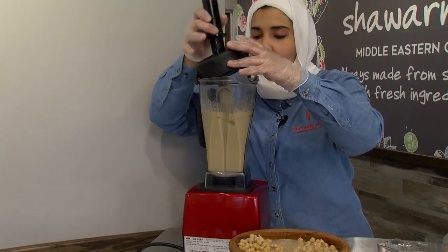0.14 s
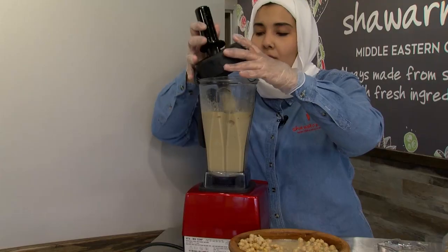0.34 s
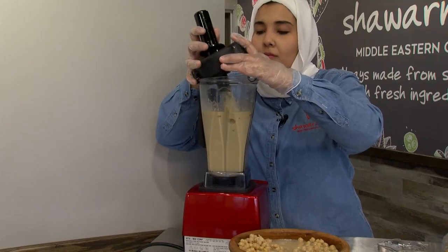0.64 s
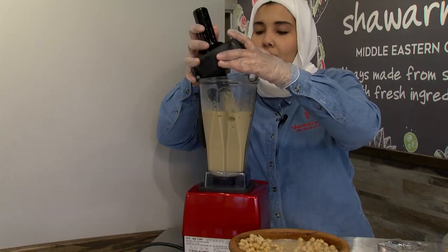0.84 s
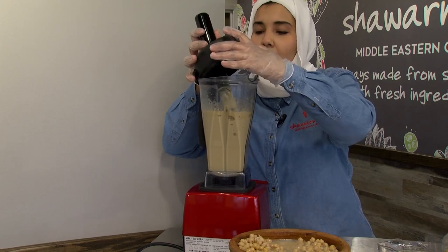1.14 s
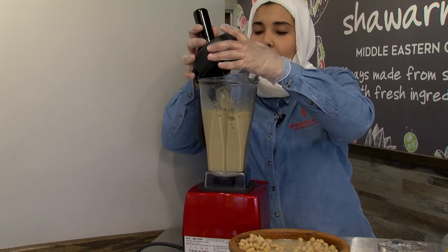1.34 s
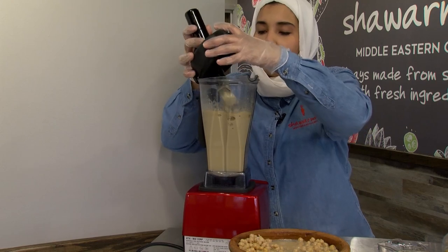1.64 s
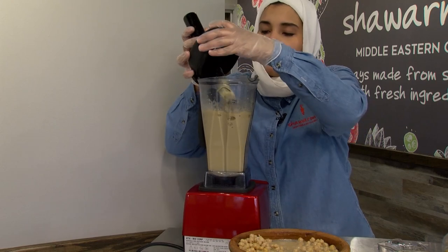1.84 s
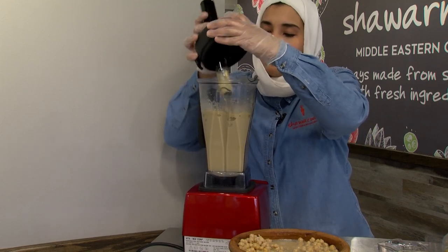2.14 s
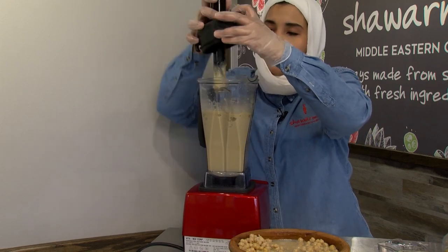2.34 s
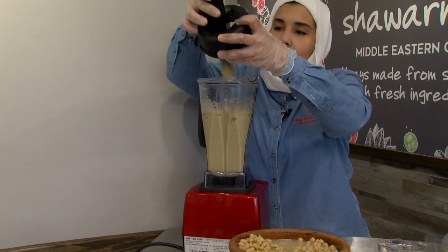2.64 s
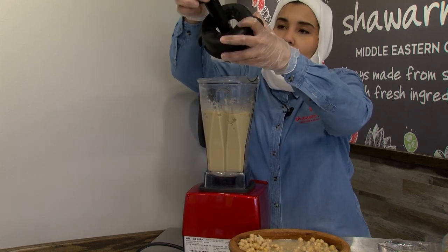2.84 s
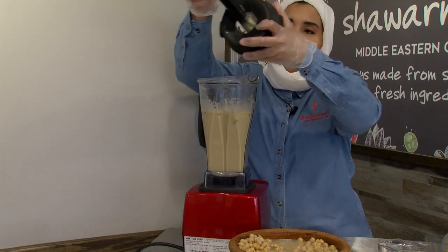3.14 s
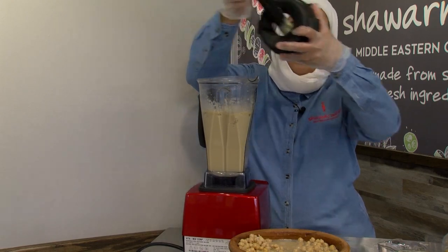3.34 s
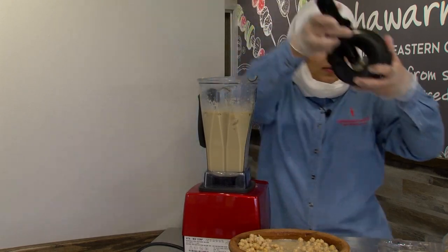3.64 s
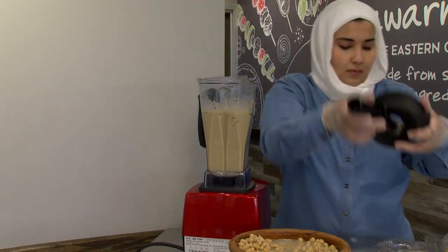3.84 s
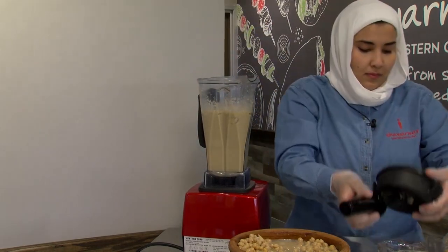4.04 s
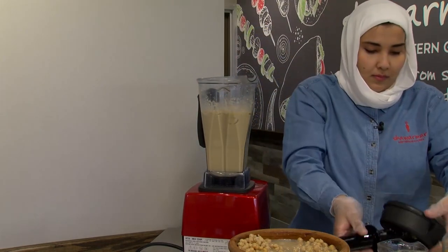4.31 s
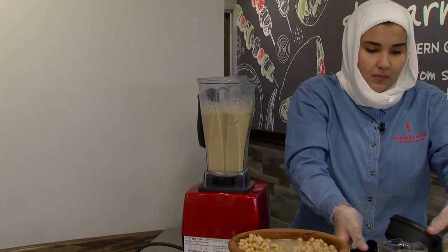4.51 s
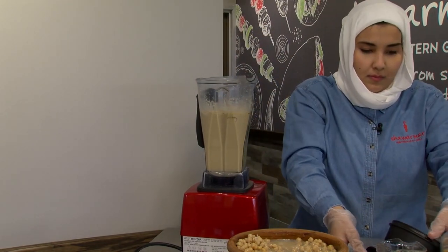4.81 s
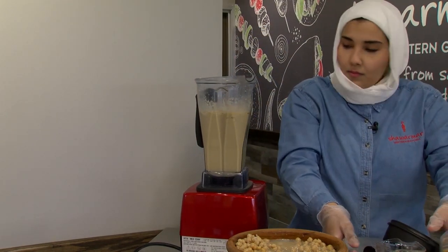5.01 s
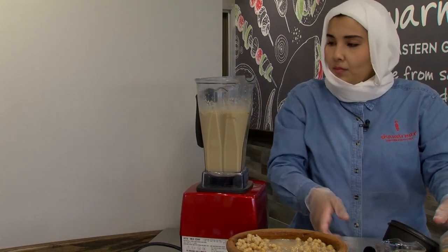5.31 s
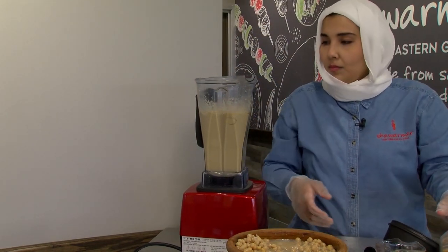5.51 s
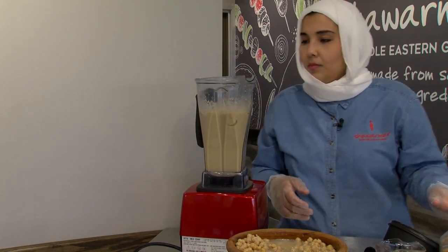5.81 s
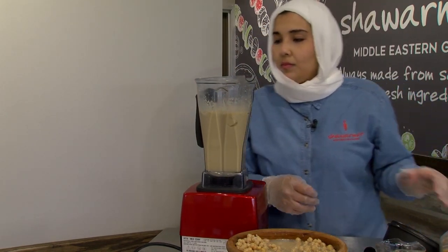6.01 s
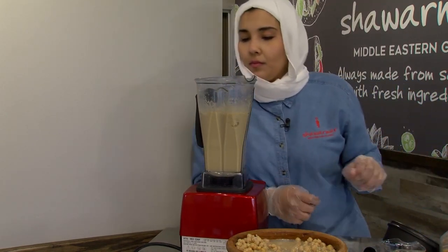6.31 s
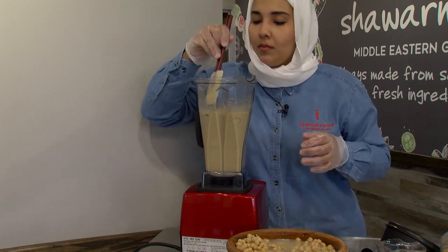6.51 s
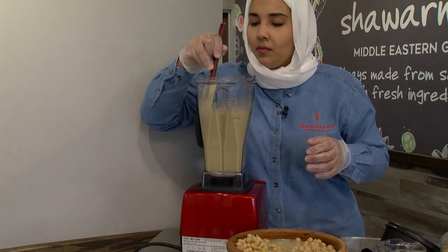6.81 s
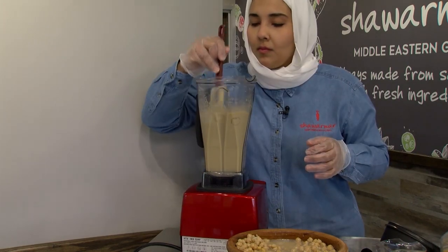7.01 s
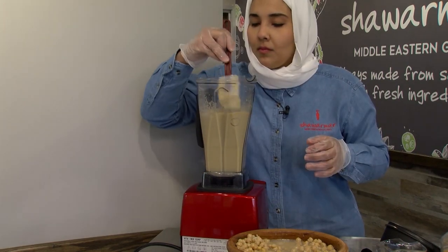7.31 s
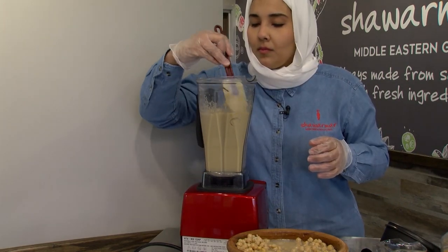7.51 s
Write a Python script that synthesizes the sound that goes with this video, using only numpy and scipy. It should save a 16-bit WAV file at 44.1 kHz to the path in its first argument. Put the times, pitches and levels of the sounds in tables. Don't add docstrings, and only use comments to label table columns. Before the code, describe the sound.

Close, continuous blender drone with wet churning hiss; the lid comes off, the tone flutters and brightens, and a dipped spatula makes it fuller.

```python
import sys
import numpy as np
from scipy import signal
from scipy.io import wavfile

SR = 44100
rng = np.random.default_rng(int(sys.argv[2]) if len(sys.argv) > 2 else 0)


def materialize(psi):
    bounded = np.clip(np.atleast_2d(psi).T, -1, 1)
    quanta = np.round(bounded * 32767).astype(np.int16)
    wavfile.write(sys.argv[1], SR, quanta)


def ratio_of_db(decibels):
    return 10 ** (np.asarray(decibels, float) / 20)


N = 337788

MAINS_HZ, MAINS_DB = 120, -49
# (frequency [Hz], level per Hz [dB])
RUMBLE_SPECTRUM = [(20, -6.5), (40, -6), (82, -24), (125, -5), (150, -7.5), (210, -4.5), (255, -23),
                   (300, 3), (400, -5), (440, 1.5), (520, -15.5)]
# (time [s], peak level [dB], pitch [Hz])
COUNTER_BUMPS = [(0.005, -33, 90), (2.63, -37, 85), (4.2, -31, 251), (6.56, -30, 230), (7.655, -36, 60)]
# (time [s], peak level [dB])
HARD_BITS = [(4.1944, -29), (5.7643, -40), (6.818, -41), (7.0643, -38), (7.072, -39), (7.088, -38),
             (7.147, -39.5)]
# (time [s], opening [0-1])
LID_OPENING = [
    (0, 0.01),
    (1.45, 0.08),
    (1.62, 0.39),
    (2.0, 0.4),
    (2.3, 0.67),
    (3.4, .8),
    (3.95, 0.99),
    (7.66, 1),
]
# (time [s], motor base level [dB], reflection hump [Hz],
# brightness from facing the jar [dB])
WEARER_MOVES = [(0, -40, 9480, 4), (.5, -44, 9400, 2), (.9, -39, 9300, 1.5), (1.45, -45, 9200, 2),
                (1.85, -51, 9100, 1), (2.3, -42.5, 9030, 0), (3.0, -40.5, 10200, 0),
                (3.35, -43, 10700, 0.5), (3.65, -31.5, 11300, 3.5), (3.95, -37, 11300, 0),
                (4.15, -33, 11400, 3), (4.7, -33.5, 11200, 2.5), (5.0, -29, 11240, 1.5),
                (5.55, -34, 10900, 2), (5.85, -32.5, 10090, 1), (6.15, -34.5, 9800, 0),
                (6.3, -35.5, 9600, -3.5), (6.7, -39.5, 8730, -1), (7.66, -39, 8700, -1)]
# (frequency [Hz], width [Hz], level [dB])
COVERED_MODES = [(517.2, 37.5, 1), (609, 84, -1), (491, 59, -8)]
# (frequency [Hz], width [Hz], level [dB])
OPEN_MODES = [(751, 186, 9), (1000, 150, -4.5), (659, 183, 4.5)]
SPATULA_IN_S, SPATULA_RAMP_S = 6.45, 0.25
PLUNGE_S, PLUNGE_DOWN_S, PLUNGE_UP_S, PLUNGE_HZ, PLUNGE_DB = 7.13, 0.1, 0.17, -290, 5.5
HOVER_S, HOVER_HALF_S, HOVER_HZ, HOVER_DB = 6.33, 0.13, 49.9, 6
# (time [s], hiss level [dB])
CHURN_VIGOUR = [(0, -35), (.6, -32.5), (1.5, -31.5), (1.62, -34.5), (2.1, -33), (2.4, -34.5), (2.95, -36),
                (3.5, -35.5), (3.75, -33.5), (4.1, -33.5), (4.6, -32), (5.1, -31.5), (5.65, -34),
                (6.25, -31.5), (6.7, -37), (7.66, -38)]
# (frequency [Hz], level per Hz [dB])
HISS_SPECTRUM = [(600, -33.5), (1000, -1), (1150, -6.5), (1450, -9), (2000, -11.5), (2800, -16),
                 (3500, -21), (5000, -25), (7000, -29), (9000, -33.5), (11000, -38.5), (13000, -44),
                 (15700, -52)]
# (time [s], half length [s], churn change [dB], blade tone change [dB])
WHIRLPOOL_SURGES = [(0.078, 0.033, 0, -4), (0.142, .02, 4, 0.5), (0.552, 0.19, 0.5, -2.5),
                    (1.208, 0.033, 1.5, -1), (2.22, 0.049, -2, -1.5), (2.407, 0.036, 3, 2),
                    (2.515, 0.073, -2, -3), (2.723, .05, -1, -3.5), (2.853, 0.034, 2, 0.5),
                    (2.98, 0.046, -3, -4.5), (3.245, 0.11, 0.5, 0.5), (3.442, .03, -1.5, -2),
                    (3.594, 0.08, 0.5, -3.5), (3.922, .04, -4, 0), (4.202, 0.018, 2.5, -2),
                    (4.29, .05, 0, -2), (4.369, 0.028, 2, 1.5), (4.596, 0.025, 3, 1), (4.766, .03, 3, 1.5),
                    (4.867, 0.072, -2.5, -4), (5.053, 0.055, 2.5, 0), (5.33, 0.027, -1.5, -2.5),
                    (5.548, .04, 2.5, 2.5), (5.632, 0.052, -2, -5.5), (5.804, .03, 3, 1),
                    (5.964, 0.02, -0.5, -0.5), (6.286, 0.034, 0.5, -2), (7.068, 0.014, 3.5, 2),
                    (7.45, .04, -.5, -1.5)]
# (time [s], speed [turns/s])
SHAFT_SPEED = [(0, 168.5), (.75, 169.7), (1.1, 169.4), (2.2, 168.7), (2.55, 168.9), (2.8, 170.6),
               (3.45, 170.9), (4.15, 171.5), (4.5, 170.6), (5.3, 171.8), (5.75, 172), (6.1, 170.4),
               (6.4, 168.9), (6.97, 169.3), (7.5, 168.2), (7.66, 167)]
# (time [s], speed loss [turns/s])
BRAKING_CHUNKS = [(0, 2.2), (.76, 2.5), (1.07, 2.2), (1.67, 1.6), (4.17, 3.3), (7.02, 1.2)]
BRAKE_S, RECOVER_S = 0.03, 0.22
# (time [s], half length [s], second order [dB], sixth [dB], eighth [dB])
JAR_WOBBLES = [(0.172, 0.11, -32.5, -28, -37), (0.446, 0.16, -36, -30, -35), (0.71, 0.19, -30.5, -24, -42),
               (1.092, 0.17, -36, -31.5, -55), (1.5, 0.13, -47, -25, -52), (2.056, 0.043, -55, -19.5, -54),
               (1.797, .1, -51, -28.5, -56), (2.3, 0.11, -42, -26, -55), (2.852, .2, -43, -33.5, -55),
               (3.3, 0.25, -38.5, -29.5, -53), (3.684, 0.17, -32.5, -38.5, -57), (4.0, 0.17, -48, -34, -53),
               (5.02, 0.091, -34, -36, -50), (5.905, 0.21, -34, -26, -52), (6.274, 0.14, -32, -29, -41),
               (6.424, 0.15, -42, -36, -34.5), (7.093, 0.31, -42, -29, -50.5)]
# (second order [dB], sixth order [dB], eighth order [dB])
STILL_JAR = (-49, -40.5, -52)
# (time [s], depth [dB])
BLADE_SLIPS = [(0.625, -0.5), (2.506, 1), (3.789, 16), (3.831, 8), (4.154, 27), (4.34, 21), (4.416, 19),
               (4.542, 38), (4.575, 5), (4.655, 6), (4.723, 39), (4.831, 19), (4.868, 24), (4.922, 15),
               (5.473, 4), (5.946, 23)]
BLADE_DB, LOADED_DB, LOADED_SAG_DB_PER_S = -12, 3, 1
MEAN_CHURN_DB, MEAN_BASE_DB = -34, -39


def in_time(rows):
    s, *columns = np.transpose(rows)
    return [np.interp(np.arange(N) / SR, s, c) for c in columns]


def bell(x, centre, width):
    return np.exp(-((x - centre) / width) ** 2)


def ramp(x, start, length):
    return np.clip((x - start) / length, 0, 1)


def rms_one(x):
    return x / np.sqrt(np.mean(x ** 2) + 1e-20)


def drift(rate, step=10):
    r = np.exp(-2 * step * np.pi * rate / SR)
    noise = rng.standard_normal(N // step + 4002)
    slow = signal.lfilter([1], [1, -2 * r, r * r], noise)[4000:]
    return np.interp(np.arange(N) / step, np.arange(len(slow)), rms_one(slow))


def resonate(x, hz, width):
    r = np.exp(-np.pi * width / SR)
    gain = (1 - r * r) / 2
    return signal.lfilter([gain, 0, -gain], [1, -2 * r * np.cos(2 * np.pi * hz / SR), r * r], x)


def coloured(spectrum, patchy_db, rate):
    hz_at, db_at = np.transpose(spectrum)
    bands = round(4 * np.log2(hz_at[-1] / hz_at[0]))
    edges = np.geomspace(hz_at[0], hz_at[-1], bands + 1)
    white, out = rng.standard_normal((2, N)), 0
    for k, (low, high) in enumerate(zip(edges, edges[1:])):
        sos = signal.butter(2, [low, high], "band", fs=SR, output="sos")
        band = signal.sosfilt(sos, white[k % 2])
        level_db = np.interp(np.log(low * high) / 2, np.log(hz_at), db_at)
        out = out + band * ratio_of_db(level_db + patchy_db * drift(rate))
    return rms_one(out)


def sliding_band(hz, base):
    return rms_one(np.real(base * np.exp(2j * np.pi * np.cumsum(hz) / SR)))


def shaft():
    t = np.arange(N) / SR
    loss = 0
    for s, hz in BRAKING_CHUNKS:
        loss = loss + hz * ramp(t, s, BRAKE_S) * np.exp(-np.maximum(t - s, 0) / RECOVER_S)
    return np.cumsum(in_time(SHAFT_SPEED)[0] - loss) / SR


def surges():
    t = np.arange(N) / SR
    return sum(bell(t, s, half) * np.array([[churn_db], [blade_db]])
               for s, half, churn_db, blade_db in WHIRLPOOL_SURGES)


def wobbles():
    t = np.arange(N) / SR
    swells = sum(bell(t, s, half) * ratio_of_db(np.array(levels_db))[:, None]
                 for s, half, *levels_db in JAR_WOBBLES)
    return 20 * np.log10(ratio_of_db(np.array(STILL_JAR))[:, None] + swells)


def mains_hum():
    t = np.arange(N) / SR
    return ratio_of_db(MAINS_DB + 2.0 * drift(2.7)) * np.sin(2 * np.pi * MAINS_HZ * t)


def rumble(base_db, vigour_db):
    shake_db = -45.5 + 0.3 * (base_db - MEAN_BASE_DB) + 0.22 * vigour_db
    return ratio_of_db(shake_db + 9.5) * coloured(RUMBLE_SPECTRUM, patchy_db=1.0, rate=4)


def thuds():
    t = np.arange(N) / SR
    return sum(ratio_of_db(db) * bell(t, s, 0.015) * np.sin(2 * np.pi * hz * (t - s))
               for s, db, hz in COUNTER_BUMPS)


def ticks():
    strikes = np.zeros(N)
    for s, db in HARD_BITS:
        strikes[round(s * SR)] = ratio_of_db(db + 3.0)
    fading = signal.lfilter([1], [1, -ratio_of_db(-60 / (0.014 * SR))], strikes + 1e-18)
    burst = fading * rng.standard_normal(N)
    return signal.sosfilt(signal.butter(1, [2500, 9000], "band", fs=SR, output="sos"), burst)


def low_air(modes, level_db):
    white, air = rng.standard_normal(N), 0
    for k, (hz, width, db) in enumerate(modes):
        ring = resonate(resonate(white, hz, width * 1.38), hz, width * 1.38)
        air = air + ratio_of_db(db) * ring * (-1) ** k
    return ratio_of_db(level_db + 0.96 * drift(24) + 0.65 * drift(5)) * rms_one(air)


def upper_air(level_db, hz, half_width):
    hz = hz + 22 * drift(6)
    base = drift(130) + 1j * drift(130)
    pace = np.cumsum(half_width) / np.max(half_width)
    return ratio_of_db(level_db - 0.5) * sliding_band(hz, np.interp(pace, np.arange(N), base))


def sheen(vigour_db, opening, hump_hz, facing_db, dipped):
    gone = ramp(opening, 0.8, 0.28)
    aside = gone * (1 - dipped)
    splash_db = -19.0 + facing_db + 0.15 * vigour_db
    hump_db = 3.5 * gone - 1.2 * dipped
    top_db = -1.2 + 5.5 * ramp(opening, 0.3, 0.5) - 0.3 * vigour_db - 2.5 * dipped
    top_db = top_db - aside * (6.5 + 4.5 * bell(hump_hz, 10600, 500))
    wall_hz = np.where(opening < 0.85, 2850, 2480)
    wall_db = 1.5 + 4.0 * aside - 2.5 * dipped
    shadow_db = -1.5 - 5.0 * bell(opening, 0.37, 0.24) + 3.0 * aside
    return splash_db, hump_hz, hump_db, top_db, wall_hz, wall_db, shadow_db, dipped


def churn(turns, hiss_db, *colour):
    hz, s, frames = signal.stft(rng.standard_normal(N), SR, nperseg=512)
    hz, at = hz[:, None] + 1, np.minimum(s * SR, N - 1).astype(int)
    splash_db, hump_hz, hump_db, top_db, wall_hz, wall_db, shadow_db, dipped = [c[at] for c in colour]
    hz_at, db_at = np.transpose(HISS_SPECTRUM)
    steady_db = np.interp(np.log(hz), np.log(hz_at), db_at)
    colour_db = (splash_db + 17.0) * np.clip((hz - 4000) / 7000, 0, 1.3)
    colour_db += hump_db * (bell(hz, hump_hz, 1300) - bell(hz, 0.81 * hump_hz, 700))
    colour_db += 0.7 * hump_db * (1 - dipped) * bell(hz, 4500 + 1.8 * (hump_hz - 9700), 550)
    colour_db += top_db * np.clip((hz - 11500) / 3500, 0, 1)
    colour_db += wall_db * bell(hz, wall_hz, 120) + shadow_db * bell(hz, 1270, 130)
    scatter_db = 2.0 * bell(hz, 4600, 700) - 2.5 * bell(hz, 7700, 400)
    scatter_db = scatter_db + 4.5 * bell(hz, 12700, 1300) - 1.5 * bell(hz, 3000, 400)
    colour_db += dipped * scatter_db
    hiss = signal.istft(frames * ratio_of_db(steady_db + colour_db), SR)[1][:N]
    hiss = hiss / np.sqrt(np.mean(ratio_of_db(2 * steady_db)))
    splutter = ratio_of_db(0.85 * drift(70))
    pulse = 1 + 0.068 * np.cos(2 * np.pi * turns) + 0.13 * np.cos(4 * np.pi * turns)
    return ratio_of_db(hiss_db + 7) * splutter * pulse * hiss


def shaft_tone(turns, level_db, order, rough, rate):
    waver = 1 + rough * (drift(rate) + 1j * drift(rate))
    return np.sqrt(2) * ratio_of_db(level_db) * np.real(waver * np.exp(2j * np.pi * order * turns))


def rocking(turns, base_db, twice_db, sixth_db, eighth_db):
    once = shaft_tone(turns, base_db - 0.6, order=1, rough=0.044, rate=4.6)
    twice = shaft_tone(turns, twice_db, order=2, rough=0.17, rate=9.7)
    sixth = shaft_tone(turns, sixth_db - 1.5, order=6, rough=0.23, rate=17)
    eighth = shaft_tone(turns, eighth_db, order=8, rough=0.42, rate=21)
    return once + twice + sixth + eighth


def blades(turns, blade_db, lumpy):
    t = np.arange(N) / SR
    slips_db = sum(depth_db * bell(t, s, 0.0047) for s, depth_db in BLADE_SLIPS)
    return shaft_tone(turns, blade_db + 0.46 - slips_db, order=4, rough=0.18 * lumpy, rate=37.5)


def scene():
    t, turns = np.arange(N) / SR, shaft()
    (opening,) = in_time(LID_OPENING)
    base_db, hump_hz, facing_db = in_time(WEARER_MOVES)
    swing_db, tone_db = surges()
    twice_db, sixth_db, eighth_db = wobbles()
    hiss_db = in_time(CHURN_VIGOUR)[0] + swing_db
    vigour_db = hiss_db - MEAN_CHURN_DB

    dipped = ramp(t, SPATULA_IN_S, SPATULA_RAMP_S)
    plunge = bell(t, PLUNGE_S, np.where(t < PLUNGE_S, PLUNGE_DOWN_S, PLUNGE_UP_S))
    hover = bell(t, HOVER_S, HOVER_HALF_S)
    loaded_db = LOADED_DB - LOADED_SAG_DB_PER_S * np.maximum(t - 6.9, 0)
    blade_db = BLADE_DB + tone_db + dipped * loaded_db

    drum_db = (twice_db + 34) * (1 - opening)
    covered_db = -17 + 0.2 * drum_db - 11.5 * opening ** 1.2 + 0.4 * vigour_db + 1.5 * dipped
    open_db = -28 + 7.38 * ramp(opening, 0.32, 0.26) + 0.49 * vigour_db
    open_db = open_db + 1.3 * dipped + 0.57 * HOVER_DB * hover
    upper_db = -26 - 13 * ramp(opening, 0.05, 0.81) + 7 * ramp(opening, 0.77, 0.12)
    upper_db = upper_db + 0.61 * vigour_db + 3.2 * ramp(t, 6.88, 0.1)
    upper_db = upper_db + PLUNGE_DB * plunge + HOVER_DB * hover
    upper_hz = 1590 + 150 * ramp(opening, 0.15, 0.6) - 15 * dipped
    upper_hz = upper_hz + PLUNGE_HZ * plunge + HOVER_HZ * hover
    half_width = 165 - 85 * ramp(opening, 0.3, 0.5) + 35 * plunge
    lumpy = ratio_of_db(0.61 * (open_db + 22.0))

    counter = mains_hum() + rumble(base_db, vigour_db) + thuds() + ticks()
    air = low_air(COVERED_MODES, covered_db + 0.041) + low_air(OPEN_MODES, open_db + 0.076)
    air = air + upper_air(upper_db, upper_hz, half_width)
    mix = churn(turns, hiss_db, *sheen(vigour_db, opening, hump_hz, facing_db, dipped))
    motor = rocking(turns, base_db + 1.2 * tone_db, twice_db, sixth_db, eighth_db)
    return (counter + air + mix + motor + blades(turns, blade_db, lumpy))[None]


def top_cut(x):
    return signal.sosfilt(signal.butter(12, 15730, fs=SR, output="sos"), x)


def record(dry):
    limited = dry / (1 + (dry / 0.92) ** 8) ** (1 / 8)
    return top_cut(limited)


dry = scene()
out = record(dry)
materialize(out)
```